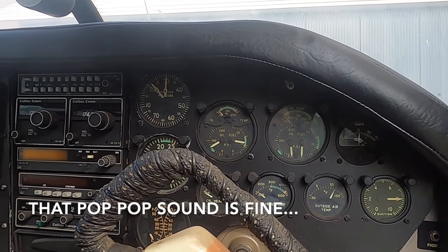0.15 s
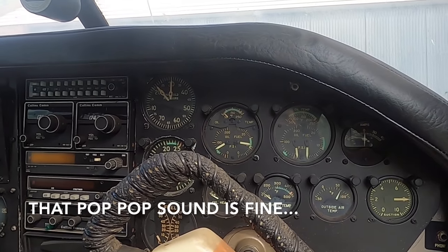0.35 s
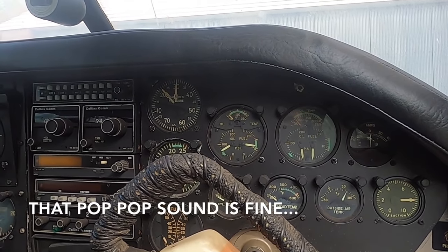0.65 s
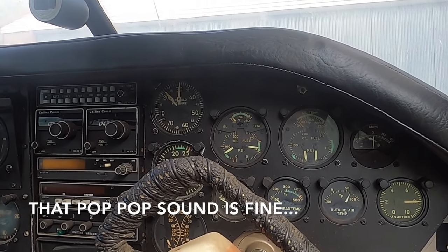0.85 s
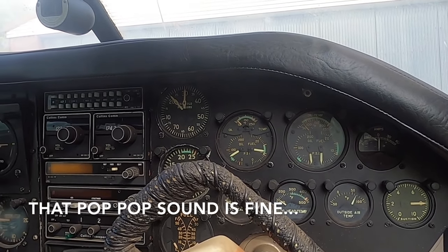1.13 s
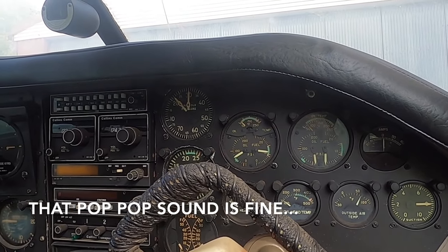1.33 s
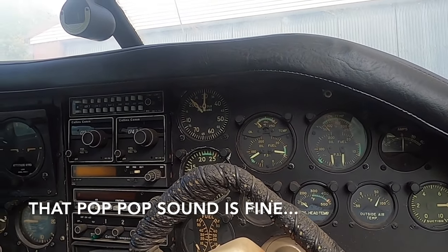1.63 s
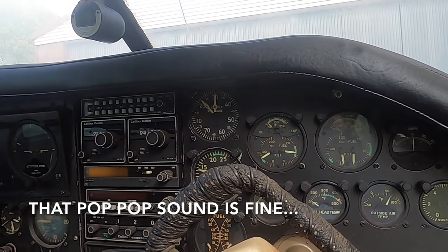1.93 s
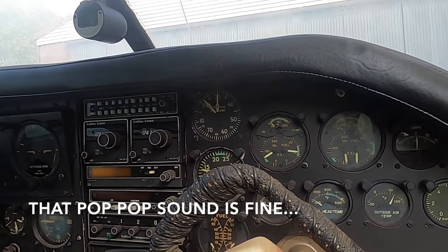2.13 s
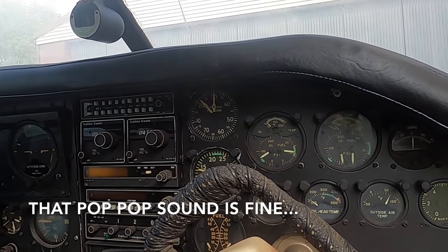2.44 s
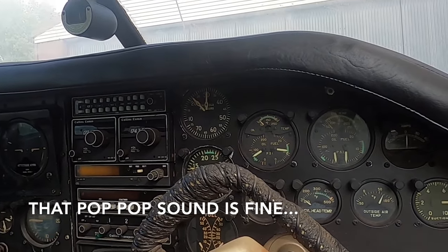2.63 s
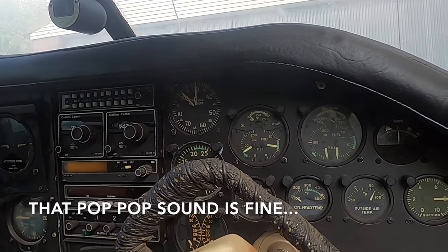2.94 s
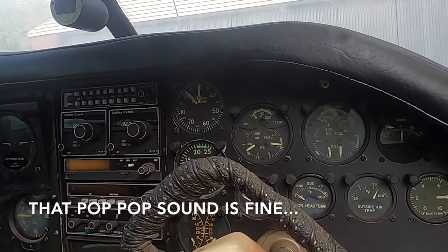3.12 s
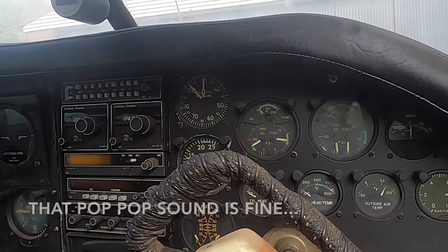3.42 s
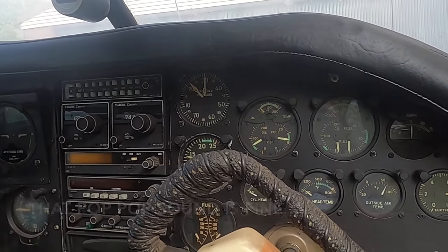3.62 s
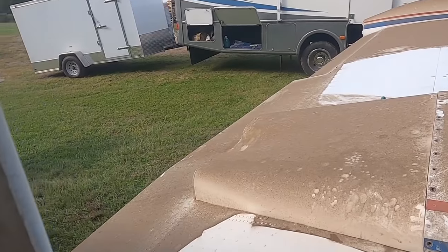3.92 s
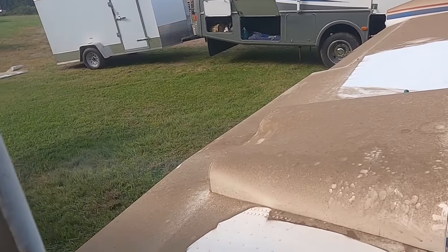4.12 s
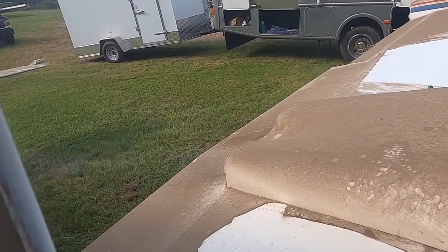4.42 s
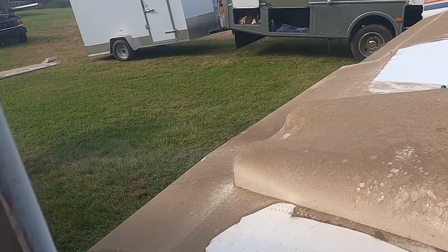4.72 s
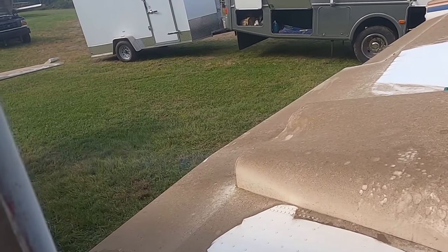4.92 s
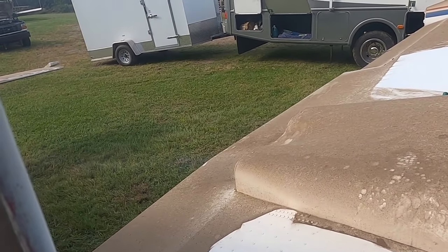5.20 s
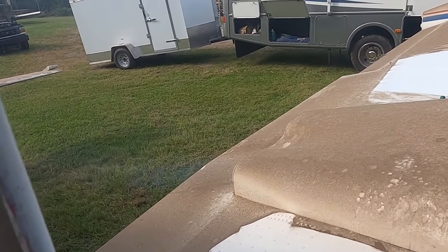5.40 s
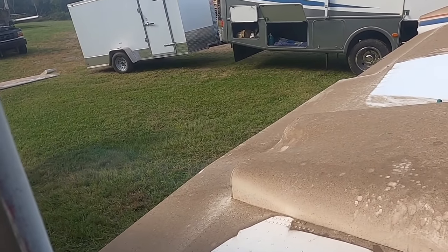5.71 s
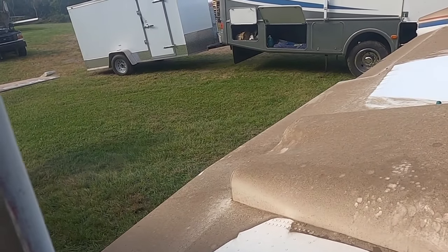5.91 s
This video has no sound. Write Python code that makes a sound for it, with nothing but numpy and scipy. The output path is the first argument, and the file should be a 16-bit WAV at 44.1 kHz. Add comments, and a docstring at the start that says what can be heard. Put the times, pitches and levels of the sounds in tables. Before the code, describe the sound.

Deep uneven propeller-engine idle booms inside a closed cockpit, then cuts suddenly to the open-door sound: sharp popping exhaust, valve ticking and airy wash.

```python
"""A deep, slightly uneven boom fills a closed aircraft cabin, then at 3.744 s the same engine is heard through the open door.
A six-cylinder piston engine idles: crank-timed pulses excite decaying modes of exhaust and airframe, heard as
boom, thud, pipe tone and knock. Unburnt charge now and then pops in the pipe, and misfires weaken pulses.
Valve openings crack and release puffs of filtered noise; struck modes tick and chuff.
Shaped noise makes the wash of propeller and cooling air."""
import sys
import numpy as np
from scipy import signal
from scipy.fft import rfft, irfft, next_fast_len
from scipy.io import wavfile

SR = 44100
rng = np.random.default_rng(int(sys.argv[2]) if len(sys.argv) > 2 else 0)


def master(y):
    """Save y as 16-bit WAV."""
    cut = np.clip(np.atleast_2d(y).T, -1, 1)
    pcm = np.round(cut * 32767)  # scale
    wavfile.write(sys.argv[1], SR, pcm.astype(np.int16))


N = 267069


def from_db(db):
    """Logarithmic level: 20 dB is a tenfold amplitude."""
    return 10 ** (np.asarray(db) / 20)


def in_time(rows):
    """Linear interpolation of (seconds, value) rows at every sample, one second of run-in included."""
    return np.interp(np.arange(N + SR) / SR - 1, *np.transpose(rows))


def band(x, edges_hz, order):
    """Band-pass filtering: a Butterworth filter keeps the range between two edges."""
    return signal.sosfilt(signal.butter(order, edges_hz, "band", fs=SR, output="sos"), x)


def coloured(spectrum):
    """Spectral shaping: white noise is weighted by (Hz, dB per Hz) rows and scaled to rms 1."""
    size = next_fast_len(N + SR)
    table_hz, table_db = np.transpose(spectrum)
    bins_hz = np.arange(size // 2 + 1) * SR / size
    gain = from_db(np.interp(np.log(bins_hz + 1), np.log(table_hz), table_db))
    noise = irfft(rfft(rng.standard_normal(size)) * gain, size)[:N + SR]
    return noise / noise.std()


def clicks_at(seconds, sizes):
    """Impulse train: one sample per event, with one second of run-in in front."""
    at = np.round((np.ravel(seconds) + 1) * SR).astype(int)
    keep = (at >= 0) & (at < N + SR)
    return np.bincount(at[keep], np.ravel(sizes)[keep], N + SR)


def ring(clicks, hz, t60):
    """Damped resonance: a unit click starts a sine from height 1 that falls 60 dB in t60 seconds."""
    radius = 10 ** (-3 / (t60 * SR))
    angle = 2 * np.pi * hz / SR
    feedback = [1, -2 * radius * np.cos(angle), radius * radius]
    return signal.lfilter([0, np.sin(angle)], feedback, clicks + 1e-18)


def ring_modes(clicks, modes):
    """Modal superposition: the same clicks excite every (Hz, signed height, t60) mode."""
    return sum(height * ring(clicks, hz, t60) for hz, height, t60 in modes)


def struck(seconds, db, modes, spread_db):
    """Modal excitation: each blow drives every (Hz, dB, t60) mode with a strength of its own."""
    spread = spread_db * rng.standard_normal((len(seconds), len(modes)))
    total = 0
    for k, (hz, level_db, t60) in enumerate(modes):
        clicks = clicks_at(seconds, from_db(db + level_db + spread[:, k]))
        total = total + ring(clicks, hz, t60)
    return total


def puffs(seconds, db, rise_s, fall_s):
    """Gas discharge envelope: the difference of two exponentials rises fast and falls more slowly."""
    t = np.arange(int(6 * fall_s * SR)) / SR
    shape = np.exp(-t / fall_s) - np.exp(-t / rise_s)
    return signal.fftconvolve(clicks_at(seconds, from_db(db)), shape / shape.max())[:N + SR]


def firing_times(crank, places):
    """Crank kinematics: times (cycles x places) at which the crank passes each place in its cycle."""
    s, done = np.transpose(crank)
    # The mean speed carries the crank one second beyond either end of the table.
    speed = (done[-1] - done[0]) / (s[-1] - s[0])
    s = np.r_[s[0] - 1, s, s[-1] + 1]
    done = np.r_[done[0] - speed, done, done[-1] + speed]
    cycles = np.arange(np.ceil(done[0]) + 1, done[-1] - 1)
    return np.interp(cycles[:, None] + places, done, s)


def misfire_db(times):
    """Lost combustion: every pulse within reach of a misfire is weakened."""
    # Each row: time in seconds, full loss in dB, of which some layers take only a share.
    misfires = [(4.275, 10), (4.372, 28), (4.566, 20), (4.663, 18), (4.955, 3), (5.818, 1.5), (5.914, 8)]
    reach_s = 0.016
    s, loss_db = np.transpose(misfires)
    return -(loss_db * (abs(times[..., None] - s) < reach_s)).sum(axis=-1)


def wash(spectrum, level_db, rumble_db, air_db, cowl_db):
    """Turbulence noise: an even rush, a lumpy swelling roar ringing in the cowling, rumble and top hiss."""
    # Level of the roar. Each row: time in seconds, rms level in dB.
    roar_level = [(0.0, -44.5), (.8, -43), (1.6, -44.5), (1.87, -37.5), (2.1, -40), (2.4, -41.5),
                  (2.7, -38), (2.9, -42), (3.74, -39.5), (3.76, -28.5), (3.9, -32), (4.4, -33.5),
                  (5.04, -35.5), (5.67, -29.5), (6.06, -31.5)]
    roar = band(coloured(spectrum), [687, 1890], order=2)
    sung = ring(roar, hz=992, t60=0.35)
    roar = roar / roar.std() + from_db(cowl_db) * sung / sung.std()
    lumps = band(rng.standard_normal(N + SR), [12, 60], order=1)
    roar = roar * from_db(2.4 * lumps / lumps.std())  # 2.4 dB rms of random level change
    rumble = band(rng.standard_normal(N + SR), [89, 175], order=3)
    air = band(rng.standard_normal(N + SR), [11400, 17000], order=2)
    return (from_db(level_db) * coloured(spectrum)
            + from_db(in_time(roar_level)) * roar / roar.std()
            + from_db(rumble_db) * rumble / rumble.std()
            + from_db(air_db) * air / air.std())


def ticks():
    """Impulsive friction noise: loose cabin panels tick as short bursts of treble noise."""
    # Each row: time in seconds, height of the burst envelope in dB.
    panel_ticks = [(0.2474, -44), (0.5262, -44), (0.7218, -45), (0.9593, -44), (1.7081, -44), (3.4207, -51)]
    s, db = np.transpose(panel_ticks)
    treble = band(rng.standard_normal(N + SR), [6000, 10500], order=2)
    return treble * puffs(s, db, rise_s=0.00055, fall_s=0.0031)


def tappet():
    """Impact excitation: the valve gear ticks bright, each tick with a colour of its own."""
    # Blows of the valve gear. Each row: time in seconds, strength in dB.
    blows = [(3.7499, -31), (3.881, -26.5), (3.906, -30), (3.927, -22), (3.9743, -22), (4.0247, -25),
             (4.0766, -35), (4.1464, -26), (4.1704, -29), (4.2187, -22), (4.2914, -26), (4.3893, -25),
             (4.4132, -19.5), (4.466, -22), (4.6578, -34), (4.6797, -26), (4.706, -25), (4.7805, -27),
             (4.8164, -23), (4.8484, -23), (4.9505, -22), (4.996, -22.5), (5.047, -22), (5.1038, -20),
             (5.1388, -20.5), (5.1676, -28), (5.191, -21), (5.237, -24.5), (5.3343, -24), (5.3816, -28),
             (5.427, -27), (5.456, -24), (5.487, -21.5), (5.5236, -23), (5.619, -25), (5.7174, -26),
             (5.7748, -22), (5.814, -33), (5.87, -27), (6.0032, -23.5)]
    # Modes of the valve gear. Each row: frequency in Hz, relative level in dB, t60 in seconds.
    metal_modes = [(4010, -11.5, .025), (4350, -13, 0.023), (4830, -14, 0.02), (5590, -12.5, 0.02),
                   (6100, -15.5, .015), (7040, -18, 0.023)]
    s, db = np.transpose(blows)
    return struck(s, db, metal_modes, spread_db=4.0)


def chuff(crank, rows):
    """Pipe resonance: exhaust strokes give short hollow knocks, each a little early or late."""
    # Modes of the pipe. Each row: frequency in Hz, relative level in dB, t60 in seconds.
    pipe_modes = [(393, -0.5, 0.046), (482, -4, 0.025), (565, 0, 0.044), (648, -1.5, 0.045),
                  (722, -6.5, 0.044)]
    uneven_db, jitter_s = 2.0, 0.0008
    places, db = np.transpose(rows)
    times = firing_times(crank, places)
    db = db + misfire_db(times) + uneven_db * rng.standard_normal(times.shape)
    times = times + jitter_s * rng.standard_normal(times.shape)
    knocks = struck(times.ravel(), db.ravel(), pipe_modes, spread_db=3.0)
    return band(knocks, [330, 800], order=2)


def gas_puffs(times, low_db, high_db, gas, uneven_db, colour_db):
    """Jet noise: each valve opening releases a burst of hiss with its own strength and colour."""
    # Edges of neighbouring hiss bands in Hz.
    edges_hz = [300, 1500, 3000, 5000, 8000, 20000]
    split_hz = 3000  # bands starting here or above take the high puff level
    hiss = coloured(gas)
    uneven = uneven_db * rng.standard_normal(times.shape)
    total = 0
    for low_hz, high_hz in zip(edges_hz, edges_hz[1:]):
        db = low_db if low_hz < split_hz else high_db
        db = db + uneven + colour_db * rng.standard_normal(times.shape)
        envelope = puffs(times, db, rise_s=0.0035, fall_s=0.0056)
        total = total + band(hiss, [low_hz, high_hz], order=2) * envelope
    return total


def cracks(times, crack_db, modes, soft_hz):
    """Pressure-step excitation: valve openings crack in the pipe, with the treble above soft_hz weak."""
    # Strength of all cracks. Each row: time in seconds, gain in dB.
    crack_gain = [(0, 2), (1.8, -4), (3.7, -4), (3.75, 1), (4.5, -1.5), (5.2, 1.5), (6.06, 6)]
    jitter_s, uneven_db = 0.0006, 1.5
    times = times + jitter_s * rng.standard_normal(times.shape)
    db = crack_db + np.interp(times, *np.transpose(crack_gain)) + misfire_db(times)
    db = db + uneven_db * rng.standard_normal(times.shape)
    return band(struck(times.ravel(), db.ravel(), modes, spread_db=2.2), [620, soft_hz], order=3)


def pops(modes, crack_modes, gas, spit_db, snap_db, spit_s, lag_s, crack_db):
    """Explosive excitation: unburnt charge lights, rings pipe and airframe, cracks, and spits gas with a snap."""
    # Each row: time in seconds, strength in dB, brightness of the snap in dB.
    events = [(.1547, 1.5, -1), (.4369, 2.5, -2), (.7193, -0.5, 1), (1.3774, -7.5, 5), (2.415, -10, 0),
              (2.509, -6, 0), (2.6964, -1.5, -1), (3.2585, -4.5, 1), (3.5395, -8.5, 5), (3.8261, -8, 6),
              (3.9227, -2.5, 3), (4.0195, -2, 5), (4.2136, -0.5, -3), (4.4083, -0.5, 2), (4.6023, 1, -4),
              (4.7, -0.5, 1), (4.8941, 0.5, -1), (4.9904, -9, -1), (5.1831, 0.5, -1), (5.3756, 1, 2),
              (5.5672, -0.5, -3), (5.7587, -0.5, 0), (6.0454, -1, 0)]
    crack_lag_s = 0.00303  # a pop cracks after it lights
    s, db, bright_db = np.transpose(events)
    body = band(ring_modes(clicks_at(s, from_db(db)), modes), [25, 1000], order=3)
    sharp = struck(s + crack_lag_s, db + crack_db, crack_modes, spread_db=2.5)
    sharp = band(sharp, [620, 1900], order=3)
    spit = coloured(gas) * puffs(s + lag_s, db + spit_db, rise_s=spit_s / 2, fall_s=spit_s)
    snap_db = db + spit_db + snap_db + bright_db
    snap = band(rng.standard_normal(N + SR), [4500, 12000], order=1)
    snap = snap * puffs(s + lag_s, snap_db, rise_s=spit_s / 2, fall_s=spit_s)
    return body + sharp + spit + snap


def drone(crank, pulses, modes, band_hz, uneven_db, misfire_share):
    """Periodic modal excitation: pulses of varying strength at set crank places ring one frequency range."""
    places, db = np.transpose(pulses)
    times = firing_times(crank, places)
    db = db + misfire_share * misfire_db(times) + uneven_db * rng.standard_normal(times.shape)
    rings = ring_modes(clicks_at(times, from_db(db)), modes)
    return signal.sosfiltfilt(signal.butter(6, band_hz, "band", fs=SR, output="sos"), rings)


def exhaust(crank, boom, thud, pipe, knock, pipe_db, knock_uneven_db):
    """Resonant response to firing: four ranges, each given as (pulses, modes), sound together."""
    # Strength of the knock. Each row: time in seconds, gain in dB.
    knock_gain = [(0, 0.5), (.8, 0.5), (1.6, -0.5), (2.4, 0.4), (3.1, 2), (3.7, 2), (3.75, 2), (3.88, 0.5),
                  (4.0, 4), (4.2, 2), (4.33, 0), (4.45, 2), (4.75, 2.5), (4.95, 0.5), (5.2, 2), (5.5, 3),
                  (5.8, 1), (6.06, 4)]
    low = drone(crank, *boom, [24, 90], uneven_db=0.3, misfire_share=0.066)
    thuds = drone(crank, *thud, [90, 168], uneven_db=0.7, misfire_share=0.5)
    tone = drone(crank, *pipe, [168, 365], uneven_db=1.0, misfire_share=0.42)
    knocks = drone(crank, *knock, [365, 880], knock_uneven_db, misfire_share=0.6)
    return low + thuds + from_db(pipe_db) * tone + from_db(in_time(knock_gain)) * knocks


def cabin():
    """Transmission into an enclosure: boom rules in the closed cabin and the treble is muffled."""
    # Crank angle. Each row: time in seconds, four-stroke cycles done.
    crank = [(-0.0271, -0.3), (0.1433, 1.5), (0.3784, 4.0), (0.6137, 6.5), (0.8488, 9.0), (1.0842, 11.5),
             (1.319, 14.0), (1.5536, 16.5), (1.7893, 19.0), (2.0255, 21.5), (2.2613, 24.0), (2.4975, 26.5),
             (2.7317, 29.0), (2.9658, 31.5), (3.2004, 34.0), (3.4343, 36.5), (3.7436, 39.8)]
    # Pulses arriving in each range. Each row: place in the cycle (0-1), strength in dB.
    boom_pulses, thud_pulses = [(0.12, 0.4), (0.284, -0.3), (0.467, -0.2), (0.628, 0.5), (0.808, -0.4),
                                (0.935, -0.1)], [(0.125, 1.4), (0.308, -3.7), (0.463, 1.7),
                                                           (0.565, 1.6), (0.751, 5.2), (0.787, -6.1)]
    pipe_pulses, knock_pulses = [(0.203, 6.6), (0.288, -0.8), (0.54, 4.3), (0.684, -7.8), (0.834, -1.0),
                                 (0.989, -1.2)], [(0.03, 4.8), (0.096, 10.7), (0.243, 1.4),
                                                            (0.395, -8.0), (0.508, -17.6), (0.627, 1.5),
                                                            (0.712, 1.8), (0.839, -2.8)]
    # Modes of each range and of a pop. Each row: frequency in Hz, signed height, t60 in seconds.
    boom_modes, thud_modes = [(19.7, 0.841, 0.171), (62.8, -0.046, 0.2), (80.9, -0.129, 0.175)], [(108.7, 0.297, 0.015), (145.7, -0.081, 0.091)]
    pipe_modes, knock_modes = [(195.7, -0.018, 0.2), (212.0, -0.028, 0.095), (303.6, 0.05, 0.119),
                               (306.9, -0.034, 0.2)], [(382.7, 0.015, 0.102), (436.8, -0.073, 0.039),
                                                   (444.4, 0.046, 0.068), (565.9, 0.016, 0.088),
                                                   (602.0, -0.008, 0.2), (802.1, -0.001, 0.2)]
    pop_modes = [(46.2, 0.177, 0.183), (66.1, -0.126, 0.25), (110.5, 0.111, 0.042), (194.5, -0.115, 0.201),
                 (234.7, 0.103, 0.07), (312.5, 0.097, 0.25), (365.5, -0.09, 0.02), (506.4, 0.075, 0.187),
                 (526.1, 0.034, 0.183), (592.7, -0.083, 0.111), (855.6, -0.006, 0.248)]
    # Valve openings. Each row: place in the cycle (0-1), then crack, low puff and high puff in dB.
    valves = [(.05, -25, 3, 4), (0.189, -32, 3, 1.5), (0.301, -24.5, -5, 0), (0.469, -26, 2.5, -5),
              (0.55, -20.5, -3, 1), (0.68, -30, 5, 1), (0.802, -25.5, -3, -2), (0.928, -21, 2, -1)]
    # Modes of a crack. Each row: frequency in Hz, relative level in dB, t60 in seconds.
    crack_modes = [(666, -9, 0.038), (805, -15.5, 0.022), (1052, -21.5, 0.058), (1290, -26, 0.033)]
    # Hollow knocks of the exhaust strokes. Each row: place in the cycle (0-1), strength in dB.
    chuffs = [(0.041, -40), (.53, -38), (.60, -41), (.79, -33.5), (.89, -34.5)]
    # Noise spectra of wash and gas. Each row: frequency in Hz, relative density in dB per Hz.
    wash_spectrum, gas_spectrum = [(60, -10), (140, -26), (230, -14), (339, -6.5), (426, -9.5), (482, -9.5),
                                   (596, -16), (662, -16), (862, -25), (1710, -29.5), (2810, -39),
                                   (5110, -37), (9300, -46), (15500, -73)], [(530, -59), (900, 1), (1080, -4), (1170, -11),
                                                       (1610, -2.5), (1910, -21), (2790, -14),
                                                       (4330, -14.5), (5370, -18), (9180, -29),
                                                       (15500, -47)]

    rush = wash(wash_spectrum, level_db=-35.5, rumble_db=-39.5, air_db=-82, cowl_db=-16)
    places, crack_db, low_db, high_db = np.transpose(valves)
    times = firing_times(crank, places)
    gas = gas_puffs(times, low_db, high_db, gas_spectrum, uneven_db=0.8, colour_db=1.0)
    gas = from_db(-45) * gas
    sharp = cracks(times, crack_db, crack_modes, soft_hz=1220)
    bangs = pops(pop_modes, crack_modes, gas_spectrum, spit_db=-48.5, snap_db=-6,
                 spit_s=0.015, lag_s=0.017, crack_db=-17.0)
    firings = exhaust(crank, (boom_pulses, boom_modes), (thud_pulses, thud_modes),
                      (pipe_pulses, pipe_modes), (knock_pulses, knock_modes),
                      pipe_db=0.8, knock_uneven_db=1.3)
    return rush + ticks() + chuff(crank, chuffs) + gas + sharp + bangs + firings


def door():
    """Direct radiation: the pipe, its cracks and the gas reach the listener through the open door."""
    # Crank angle. Each row: time in seconds, four-stroke cycles done.
    crank = [(3.7323, -0.3), (3.9061, 1.5), (4.0998, 3.5), (4.2939, 5.5), (4.4884, 7.5), (4.6832, 9.5),
             (4.8777, 11.5), (5.0703, 13.5), (5.2629, 15.5), (5.4551, 17.5), (5.6466, 19.5), (5.8379, 21.5),
             (6.0591, 23.8)]
    # Pulses arriving in each range. Each row: place in the cycle (0-1), strength in dB.
    boom_pulses, thud_pulses = [(0.318, 0.4), (0.399, -1.1), (0.498, -0.3), (0.818, 0.1), (0.891, -0.7),
                                (0.982, 1.6)], [(0.077, -3.8), (0.261, 4.5), (0.445, -3.4),
                                                          (0.555, 5.2), (0.745, 2.3), (0.892, -4.8)]
    pipe_pulses, knock_pulses = [(0.078, -1.2), (0.16, 5.0), (0.42, -3.0), (0.504, 3.5), (0.741, -4.5),
                                 (0.895, 0.2)], [(0.057, -6.2), (0.187, 11.3), (0.353, 4.3),
                                                           (0.448, 3.0), (0.546, 1.0), (0.663, -7.2),
                                                           (0.797, 0.7), (0.911, -7.1)]
    # Modes of each range and of a pop. Each row: frequency in Hz, signed height, t60 in seconds.
    boom_modes, thud_modes = [(31.0, 0.58, 0.2), (43.2, -1.297, 0.057), (73.9, -0.117, 0.175)], [(93.3, -0.062, 0.2), (129.4, -0.132, 0.089)]
    pipe_modes, knock_modes = [(181.7, -0.493, 0.024), (214.0, 0.201, 0.099), (263.3, 0.024, 0.2),
                               (309.5, 0.033, 0.162)], [(374.1, -0.012, 0.155), (459.7, 0.026, 0.102),
                                                  (599.4, 0.092, 0.071), (636.4, 0.017, 0.2),
                                                  (640.5, -0.269, 0.017), (683.6, 0.126, 0.018)]
    pop_modes = [(47.2, 0.123, 0.046), (56.6, -0.062, 0.249), (93.5, 0.119, 0.091), (194.6, 0.371, 0.127),
                 (207.5, -0.6, 0.027), (324.2, 0.277, 0.091), (421.0, 0.056, 0.108), (516.3, -0.352, 0.054),
                 (565.7, 0.431, 0.045), (636.1, 0.13, 0.103), (762.2, -0.102, 0.083)]
    # Valve openings. Each row: place in the cycle (0-1), then crack, low puff and high puff in dB.
    valves = [(.01, -26, 3.5, 1), (.05, -17, -8, -14), (.18, -16, 1.5, -1.5), (0.24, -14.5, 6, 7.5),
              (0.322, -30, -6, -8), (0.441, -25, 2.5, -1.5), (0.509, -52, 0, 3.5), (0.547, -20, 5, -0.5),
              (0.69, -11, 0.5, 2.5), (.76, -17, 6.5, 3.5), (0.845, -21.5, 0.5, 5.5), (0.94, -14.5, 4.5, 4)]
    # Modes of a crack. Each row: frequency in Hz, relative level in dB, t60 in seconds.
    crack_modes = [(855, -21, 0.014), (999, -10.5, 0.021), (1347, -13.5, 0.01), (1630, -35, 0.019)]
    # Hollow knocks of the exhaust strokes. Each row: place in the cycle (0-1), strength in dB.
    chuffs = [(.03, -35.5), (0.159, -36), (.52, -31), (.79, -27.5), (.87, -28.5)]
    # Noise spectra of wash and gas. Each row: frequency in Hz, relative density in dB per Hz.
    wash_spectrum, gas_spectrum = [(140, -3.5), (230, -14.5), (265, -5), (441, -7.5), (639, -14),
                                   (789, -24), (993, -17), (1180, -20), (2080, -30), (2230, -37),
                                   (4140, -28), (8520, -38), (15500, -64)], [(470, -4), (800, -4), (1000, -5.5), (1220, -9.5),
                                                      (1700, -12.5), (1860, -36), (2050, -16), (2270, -27),
                                                      (2440, -22.5), (2940, -22), (4010, -14.5),
                                                      (5750, -19.5), (6590, -29), (7100, -21.5),
                                                      (8550, -20), (10500, -36), (13000, -43.5),
                                                      (15500, -47)]
    gas_lead_s = 0.0038  # gas starts ahead of the crack

    rush = wash(wash_spectrum, level_db=-28.5, rumble_db=-36.0, air_db=-64, cowl_db=-5.5)
    places, crack_db, low_db, high_db = np.transpose(valves)
    times = firing_times(crank, places)
    gas = gas_puffs(times - gas_lead_s, low_db, high_db, gas_spectrum, uneven_db=1.8, colour_db=1.6)
    gas = from_db(-32) * gas
    sharp = cracks(times, crack_db, crack_modes, soft_hz=1800)
    bangs = pops(pop_modes, crack_modes, gas_spectrum, spit_db=-29, snap_db=-9.5,
                 spit_s=0.0053, lag_s=0.0013, crack_db=-12)
    firings = exhaust(crank, (boom_pulses, boom_modes), (thud_pulses, thud_modes),
                      (pipe_pulses, pipe_modes), (knock_pulses, knock_modes),
                      pipe_db=1, knock_uneven_db=0.9)
    return rush + tappet() + chuff(crank, chuffs) + gas + sharp + bangs + firings


def scene():
    """Linear crossfade: the closed cabin gives way to the open door within a few milliseconds."""
    change_s, fade_s = 3.744, 0.0021
    outside = np.clip((np.arange(N) / SR - change_s) / fade_s, 0, 1)
    mix = (1 - outside) * cabin()[SR:] + outside * door()[SR:]  # the run-in is dropped
    return mix[None]


def record(dry):
    """Saturation and band limiting: a tanh curve rounds peaks, a steep low-pass cuts the top."""
    overload = 7.5  # height at which peaks flatten
    dry = overload * np.tanh(dry / overload)
    low_pass = signal.ellip(14, 0.3, 100, 15680, fs=SR, output="sos")  # 0.3 dB ripple, 100 dB stop, Hz
    return signal.sosfilt(low_pass, dry)


dry = scene()
out = record(dry)
master(out)
```